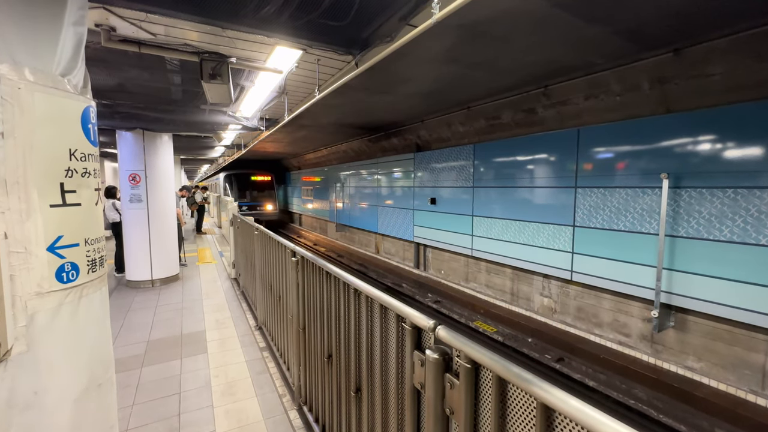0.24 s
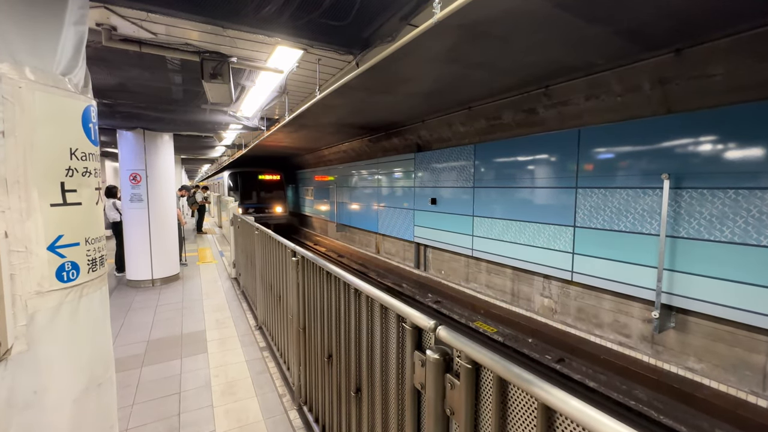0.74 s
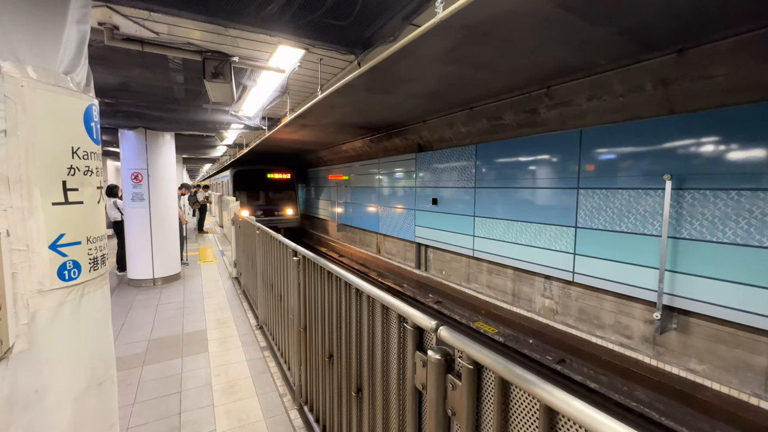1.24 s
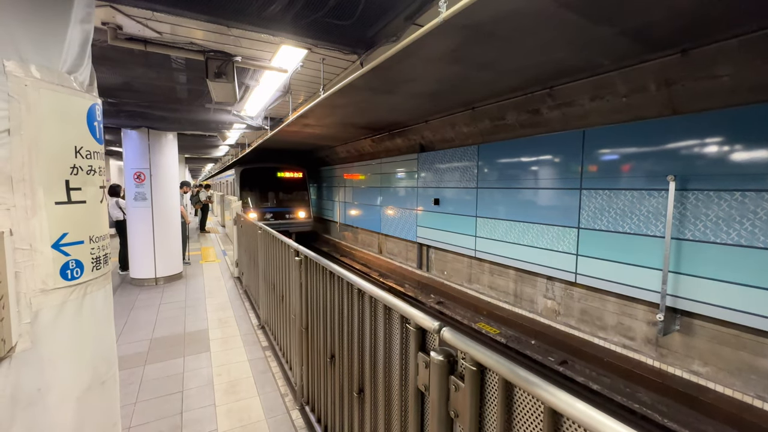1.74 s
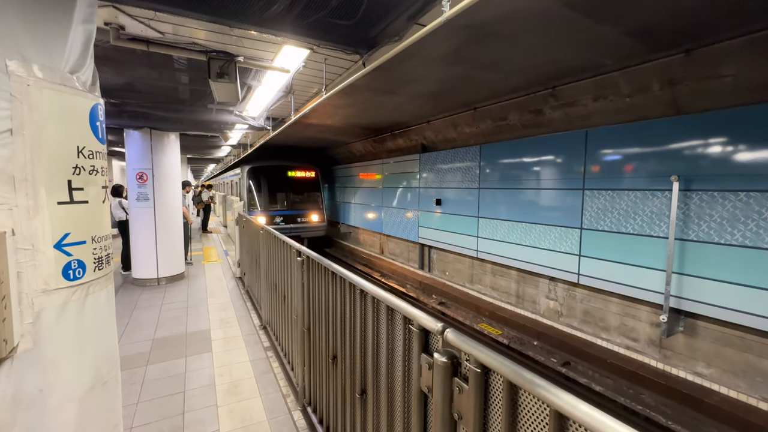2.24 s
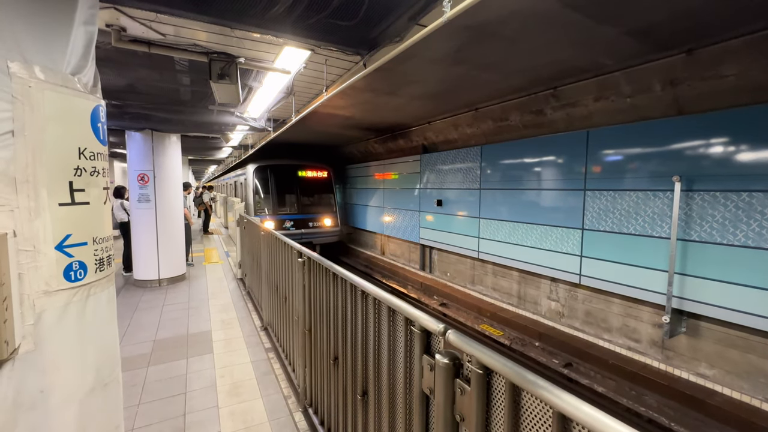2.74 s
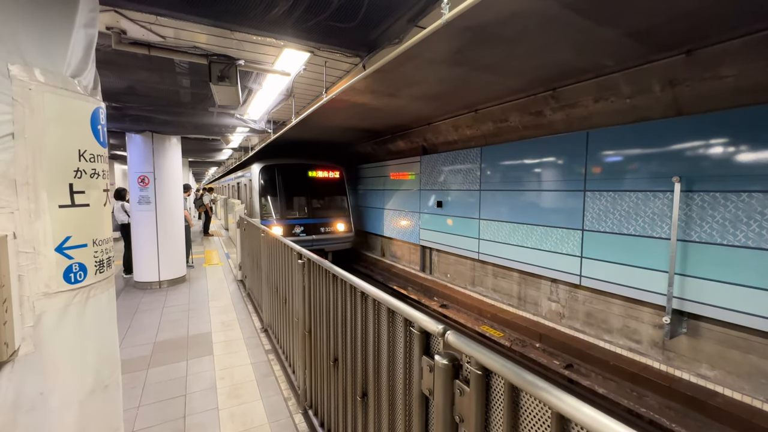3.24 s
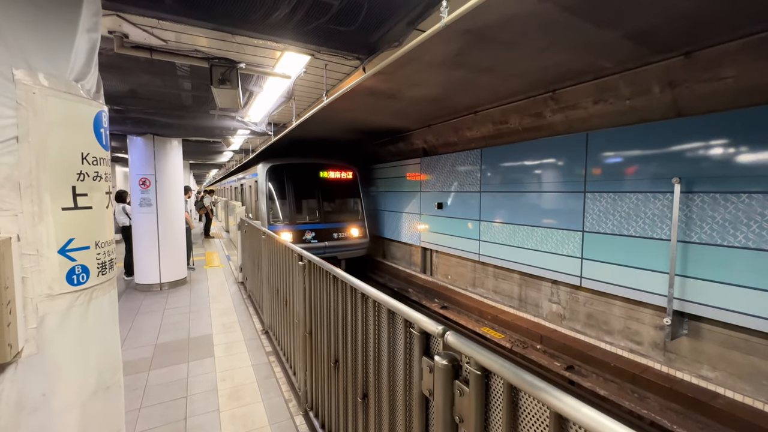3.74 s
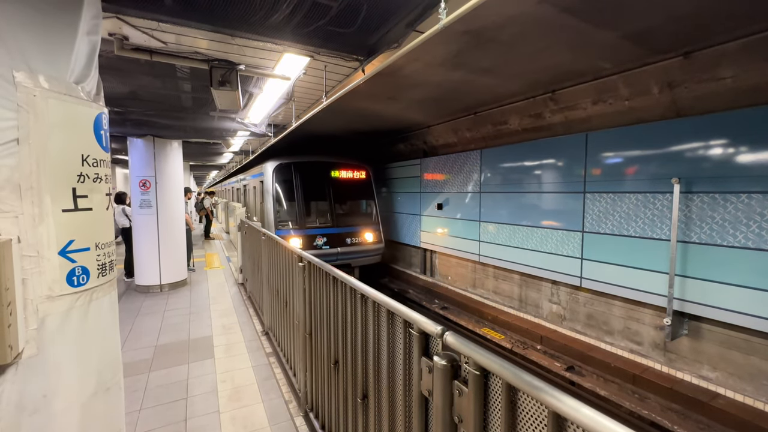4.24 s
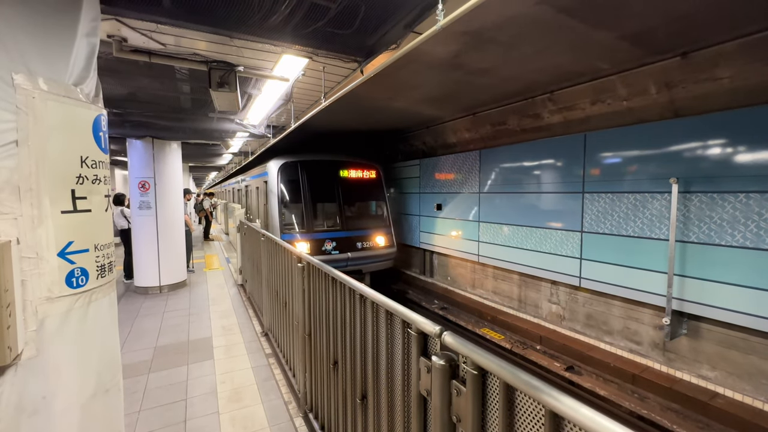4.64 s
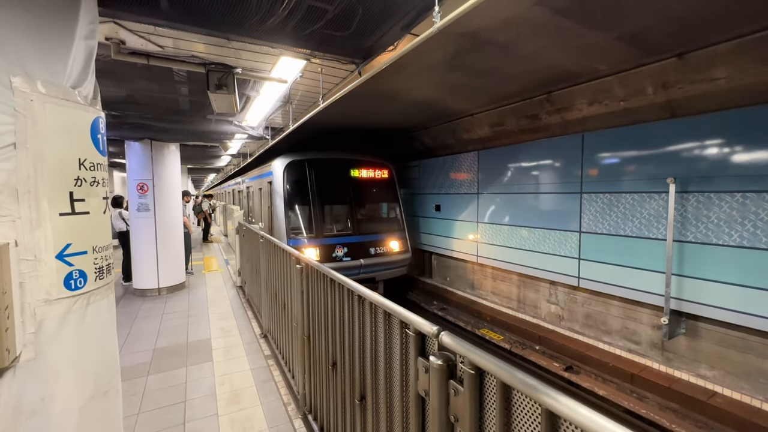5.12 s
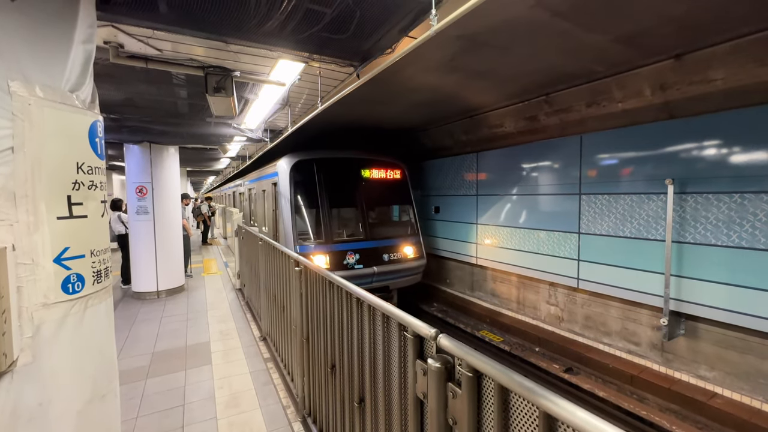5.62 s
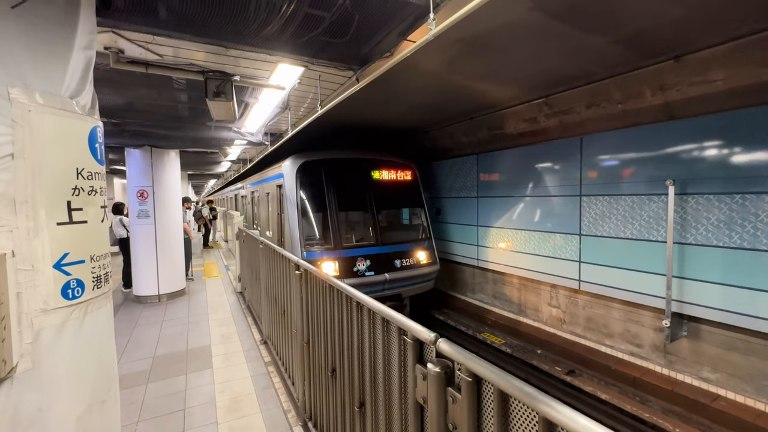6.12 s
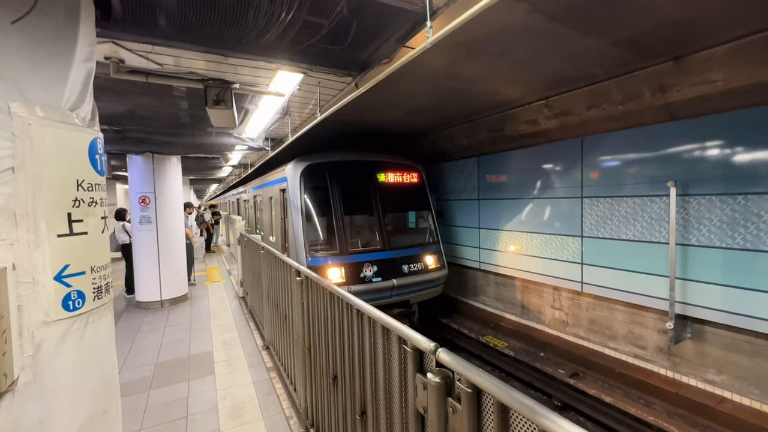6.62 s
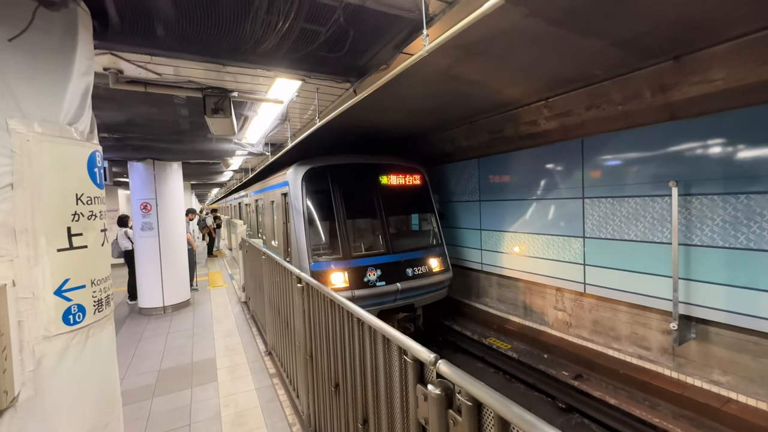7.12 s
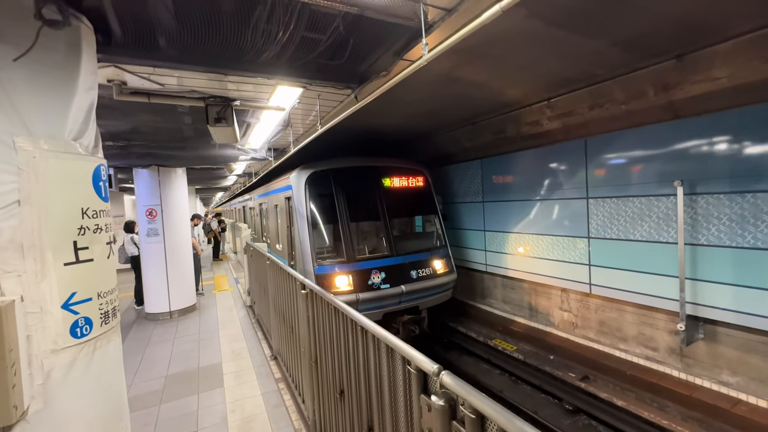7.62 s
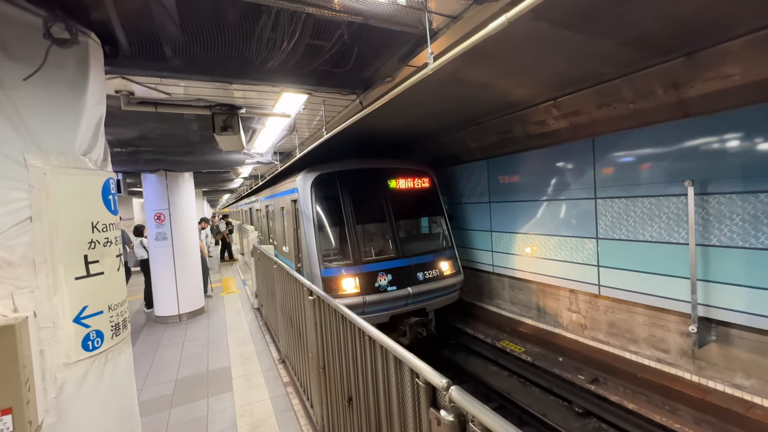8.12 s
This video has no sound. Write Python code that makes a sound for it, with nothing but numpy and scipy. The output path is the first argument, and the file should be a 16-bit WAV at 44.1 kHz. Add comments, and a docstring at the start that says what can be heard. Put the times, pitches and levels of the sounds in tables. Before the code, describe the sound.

A metro train brakes into a tiled underground station, high wavering wheel squeals over a low rumble and roar, squealing fading out near the end.

```python
"""Metro train braking into a station

A train brakes into a tiled underground station, heard by a phone on the platform.
Wheels and brakes squeal: near sines slide along pitch curves, and a diffuse hall tail smears them.
Bands of shaped noise make the tunnel rumble, the car body drone, the rail roar and the wheel hiss.
The phone's wind filter thins the rumble for a while. A wavering sine is the transformer hum;
blurred noise bursts are rail joints knocking down the track."""
import sys
import numpy as np
from scipy import signal
from scipy.fft import rfft, irfft, next_fast_len
from scipy.io import wavfile
from scipy.ndimage import uniform_filter1d

SR = 44100
rng = np.random.default_rng(int(sys.argv[2]) if len(sys.argv) > 2 else 0)


def wrap_up_sound(samples):
    """Save the sound to the file named by the first command line argument, as 16-bit audio."""
    columns = np.atleast_2d(samples).T
    # keep every value between -1 and 1, then stretch to whole-number steps
    tamed = np.clip(columns, -1, 1)
    steps = np.round(tamed * 32767).astype(np.int16)
    wavfile.write(sys.argv[1], SR, steps)


N = 369116
SIZE = next_fast_len(N + SR)  # transform length, with room for a 1 s tail
FREQ = np.arange(SIZE // 2 + 1) * SR / SIZE
LEFT_LAG, REAR_LAG = 14, 17  # samples by which the left port hears the front and rear wheels late


def undb(db):
    """Decibels to amplitude."""
    return 10 ** (np.asarray(db) / 20)


def over_time(table):
    """Columns of a curve at every sample."""
    s, *columns = np.transpose(table)
    return [np.interp(np.arange(N) / SR, s, column) for column in columns]


def over_freq(points):
    """A (Hz, value) table at every transform bin, straight over log frequency."""
    hz, value = np.transpose(points)
    return np.interp(np.log(FREQ + 1), np.log(hz), value)


def walk(rate, size=N):
    """Random levels held 1 / rate s and smoothed twice into slow drift; spread near 1."""
    hold = int(SR / rate)
    steps = np.repeat(rng.standard_normal(size // hold + 1), hold)
    return 1.333 * uniform_filter1d(uniform_filter1d(steps, hold), hold)[:size]


def add(track, start, sound):
    """Mix a sound in at a time in s."""
    i = max(int(start * SR), 0)
    track[..., i:i + sound.shape[-1]] += sound[..., :N - i]


# Likeness of the noise at the two ports. Each row: frequency in Hz, shared part of the power 0-1.
PORT_LIKENESS = [(30, 1), (130, 0.6), (300, 0.44), (700, 0.18), (1500, 0.11), (3000, 0.043), (9000, 0.16)]


def noise(colour):
    """Stereo noise of rms 1; the shared part comes from the right and reaches the left port late."""
    shared, left, right = rfft(rng.standard_normal((3, SIZE)))
    alike = np.clip(over_freq(PORT_LIKENESS), 0, 1)
    late = np.exp(-2j * np.pi * FREQ * LEFT_LAG / SR)
    common = np.sqrt(alike) * np.array([shared * late, shared])
    separate = np.sqrt(1 - alike) * np.array([left, right])
    inside = (FREQ > colour[0][0]) & (FREQ < colour[-1][0])
    out = irfft((common + separate) * undb(over_freq(colour)) * inside, SIZE)[:, :N]
    return out / np.sqrt(np.mean(out ** 2))


# Bass levels at the phone. Each row: time in seconds, deep throb in dB, rumble in dB.
BASS_LEVELS = [(0, -44, -22), (.4, -42, -22.5), (1.1, -42, -28), (1.5, -37, -26), (1.62, -53, -35.5),
               (2.4, -54, -31.5), (2.9, -49, -29), (3.3, -41, -30.5), (4.1, -43, -31.5), (4.9, -63, -34),
               (5.05, -35, -26.5), (5.9, -43, -26), (6.35, -32, -25), (6.9, -31.5, -22.5), (7.1, -33, -24),
               (7.35, -31, -20), (7.9, -25, -21), (8.37, -33, -22)]
# Noise colours. Each row: frequency in Hz, relative density in dB per Hz.
THROB_COLOUR = [(15, -30), (28, -13), (45, 0), (60, -3), (90, -30)]
RUMBLE_COLOUR = [(30, -44), (60, 2), (74, -1.5), (85, 2.5), (100, -4), (118, -2), (180, -17.5)]


def bass():
    """Deep throb and rumble, thinned from about 1.6 to 5 s while the phone's wind filter cuts the bass."""
    throb_db, rumble_db = over_time(BASS_LEVELS)
    throb = noise(THROB_COLOUR) * undb(throb_db)
    return throb + noise(RUMBLE_COLOUR) * undb(rumble_db + 0.18 * walk(5.5))


# Rolling levels. Each row: time in seconds, car body drone in dB, rail roar in dB, wheel hiss in dB.
ROLLING_LEVELS = [(0, -24, -22, -29), (.42, -29, -27.5, -34.5), (.77, -25, -25.5, -31.5),
                  (1.19, -29, -28.5, -36), (1.49, -26.5, -24, -34), (1.65, -36.5, -29, -32),
                  (2.26, -33, -28, -30.5), (2.4, -31.5, -24.5, -30.5), (2.6, -32, -23.5, -29),
                  (2.75, -25.5, -19, -28), (3.2, -29.5, -21, -29), (3.64, -22, -18.5, -29),
                  (3.95, -28, -19.5, -27.5), (4.3, -32, -19.5, -29), (4.5, -27.5, -22.5, -31),
                  (4.89, -28.5, -24, -33.5), (4.99, -23.5, -21.5, -28.5), (5.1, -25.5, -20.5, -30),
                  (5.5, -24.5, -23.5, -30.5), (5.97, -29.5, -24, -32), (6.07, -28.5, -23, -30),
                  (6.22, -26, -24.5, -31.5), (6.6, -25.5, -23, -28.5), (7.15, -27, -22, -30),
                  (7.4, -27.5, -21.5, -29), (7.6, -30, -22, -29.5), (8.0, -26.5, -21, -26.5),
                  (8.37, -28, -23, -29.5)]
# Noise colours. Each row: frequency in Hz, relative density in dB per Hz.
DRONE_COLOUR = [(80, -16), (135, 2.5), (200, 0.5), (280, -2), (400, -37)]
ROAR_COLOUR = [(200, -15.5), (300, -2.5), (350, -0.5), (392, 2.5), (455, -2.5), (482, -0.5), (500, -4),
               (600, -5.5), (700, -4), (760, -3.5), (830, -6), (1100, -9), (2000, -55)]
HISS_COLOUR = [(600, -3), (1300, 0.5), (2200, -5.5), (4000, -14.5), (7000, -24), (10200, -31), (10600, -60),
               (12300, -60), (13200, -28), (16000, -43)]


def rolling():
    """Wheels on rails as three noise bands, each with its own slight level flicker."""
    drone_db, roar_db, hiss_db = over_time(ROLLING_LEVELS)
    drone = noise(DRONE_COLOUR) * undb(drone_db + 0.63 * walk(14))
    roar = noise(ROAR_COLOUR) * undb(roar_db + 0.86 * walk(14))
    hiss = noise(HISS_COLOUR) * undb(hiss_db + 0.98 * walk(20))
    return drone + roar + hiss


# Transformer hum. Each row: time in seconds, level in dB before a slight flicker.
HUM_LEVELS = [(0, -36), (1.0, -34), (1.3, -57), (3.6, -59), (3.8, -31), (4.6, -34), (5.2, -24.5),
              (5.4, -43), (5.7, -27), (6.2, -26), (6.4, -36), (8.37, -35)]
HUM_HZ = 117  # centre of a slight drift


def hum():
    """A transformer hums on one line, slightly unsteady in pitch and level."""
    phase = 2 * np.pi * np.cumsum(HUM_HZ + .6 * walk(3)) / SR
    return np.sin(phase) * undb(over_time(HUM_LEVELS)[0] + 1.5 * walk(8))


# Rail joints far down the track. Each row: start in seconds, level in dB.
KNOCK_HITS = [(2.31, -34), (3.29, -25.5), (3.81, -27.5), (5.02, -43), (6.281, -26.5)]
# Knock colour. Each row: frequency in Hz, relative density in dB per Hz.
KNOCK_COLOUR = [(500, -30), (1400, -6), (1580, 12), (1750, 2), (2000, 5), (2500, -6), (2900, 2), (3200, -8),
                (4500, -9), (14000, -51)]


def knocks(rise_s=0.019, t60_s=0.79):
    """Blows that arrive blurred by the tunnel: noise with a quick rise and a tail."""
    t = np.arange(SR) / SR
    shape = np.clip(t / rise_s, 0, 1) * np.exp(-np.log(1000) * t / t60_s)
    swell = np.zeros(N)
    for start, db in KNOCK_HITS:
        add(swell, start, shape * undb(db))
    return swell * noise(KNOCK_COLOUR)


# Squealing further back, shared by scrape and chorus. Each row: time in seconds, level in dB before trims.
CHORUS_LEVELS = [(0, -35), (.93, -38), (1.3, -36.5), (2.52, -36), (2.7, -44.5), (3.28, -45), (3.5, -36),
                 (4.34, -36.5), (4.61, -42), (5.2, -31.5), (5.5, -44), (5.74, -34.5), (6.22, -35),
                 (6.64, -42), (6.78, -80), (7.0, -57), (7.3, -52), (7.45, -66), (8.37, -75)]
CHORUS_TRIM_DB, SCRAPE_TRIM_DB = -11, -3.5
# Brake scrape colour. Each row: frequency in Hz, relative density in dB per Hz.
SCRAPE_COLOUR = [(3000, -41), (4500, -2), (6500, 6.5), (7500, -5), (9000, 15.5), (10300, -30), (11200, -55),
                 (16000, -37)]


def scrape():
    """Brake pads grind as flickering noise that swells with the chorus of squeals."""
    flicker_db = 2.5 * walk(10)
    return noise(SCRAPE_COLOUR) * undb(over_time(CHORUS_LEVELS)[0] + SCRAPE_TRIM_DB + flicker_db)


# Squeals clean up as the train slows. Each row: squeal start in seconds, unsteadiness (a factor on
# waver, hops and slips), rasp depth 0-1.
SQUEAL_ROUGHNESS = [(0, 1, 0.32), (4.1, 0.86, 0.16), (5.14, 0.97, 0.2), (5.36, 0.3, 0.14),
                    (6.3, 0.32, 0.32), (6.6, 0.18, 0.26)]


def squeals(curves, waver_percent=0.92, flutter_db=3.0, octave_db=-10, octave_top_db=-21,
            hop_share=0.0082, slip_db=-9, rise_s=0.0039, fall_s=0.025):
    """Stick-slip on a wheel mode: a near sine that wavers, hops, slips and rasps under a saturating octave."""
    out = np.zeros(N)
    waver, flutter, rasp = [walk(rate, size=2 * N) for rate in (220, 50, 400)]
    hop = np.tanh(3 * walk(35, size=2 * N))  # mostly flips between two close pitches
    slip = np.clip(2 * walk(70, size=2 * N) - 1, 0, 1)  # 1 where grip is lost
    when, unsteadiness, rasp_depth = np.transpose(SQUEAL_ROUGHNESS)
    for curve, place in zip(curves, rng.random(len(curves))):
        s, pitch, db = np.transpose(curve)
        t = np.arange(int(max(s[-1] - s[0], .01) * SR)) / SR
        # each squeal reads its own random stretch of the drifts
        own = slice(int(place * N), int(place * N) + len(t))
        unsteady = np.interp(s[0], when, unsteadiness)
        depth = np.interp(s[0], when, rasp_depth)

        hz = np.interp(t + s[0], s, pitch)
        hz = hz * (1 + waver_percent / 100 * unsteady * waver[own])
        hz = hz * (1 + hop_share * unsteady * hop[own])
        phase = 2 * np.pi * np.cumsum(hz) / SR

        level_db = np.interp(t + s[0], s, db) + flutter_db * flutter[own]
        level_db = level_db + slip_db * unsteady * slip[own]
        swell = np.clip(np.minimum(t / rise_s, (t[-1] - t) / fall_s), 0, 1)
        swell = swell * undb(level_db) * (1 + depth * rasp[own])

        # the octave levels off on loud squeals; high squeals have none
        octave_swell = undb(octave_db + octave_top_db) * np.tanh(swell / undb(octave_top_db))
        octave = octave_swell * np.sin(2 * phase) * (pitch[0] < SR / 5)
        add(out, s[0], swell * np.sin(phase) + octave)
    return out


SLIDE_SPAN_HZ = 306  # full spread of the chance slides early on


def short(rows):
    """Brief squeals slide straight by a chance amount, mostly down, less once the train is slow."""
    slowing = np.interp(np.transpose(rows)[0], [5.2, 6.4], [1, .35])
    slides = SLIDE_SPAN_HZ * (rng.random(len(rows)) - .62) * slowing
    curves = []
    for (start, length, hz, db), slide in zip(rows, slides):
        curves.append([(start, hz - slide / 2, db), (start + length, hz + slide / 2, db)])
    return squeals(curves)


def chorus(count=700):
    """Fainter wheels further back: short squeals scattered over time and high modes, following a level curve."""
    when, pitch, length, loud = rng.random((count, 4)).T
    start = when * N / SR
    hz = 5500 + 5000 * pitch ** .55
    db = np.interp(start, *np.transpose(CHORUS_LEVELS)) + CHORUS_TRIM_DB + 5 * (loud - .5)
    return short(np.transpose([start, 0.038 + 0.121 * length, hz, db]))


# Short squeals. Each row: start in seconds, length in seconds, mid pitch in Hz, level in dB before flutter.
SHORT_SQUEALS = [(.075, 0.086, 8580, -36), (.11, 0.067, 5800, -34), (.125, 0.16, 8710, -32),
                 (.224, 0.035, 9200, -21), (.36, 0.11, 4930, -38), (.5, 0.145, 4940, -38),
                 (.14, .1, 8950, -29.5), (.3, .13, 8840, -46), (.55, 0.137, 8900, -36),
                 (.69, 0.081, 7960, -29), (.95, 0.071, 8440, -46), (.37, 0.113, 5930, -38),
                 (.96, 0.166, 4780, -36), (.635, .04, 6120, -36), (.439, 0.093, 9230, -27),
                 (.459, 0.17, 8500, -35), (.53, 0.12, 8130, -33), (.4, 0.11, 6900, -28),
                 (.683, 0.1, 7120, -28), (.763, 0.13, 9360, -25), (.763, 0.17, 8360, -35),
                 (1.098, 0.062, 9300, -29), (1.207, 0.11, 4810, -32.5), (1.25, 0.12, 8470, -35),
                 (1.352, 0.1, 9570, -33), (.79, 0.15, 5430, -38.5), (1.402, 0.074, 9270, -38),
                 (1.417, 0.07, 8900, -19), (1.591, 0.103, 8660, -33.5), (1.726, 0.14, 9700, -28.5),
                 (1.776, 0.094, 4900, -32), (1.82, 0.11, 5530, -38), (1.821, 0.088, 8700, -32),
                 (1.906, 0.14, 9160, -28), (2.02, 0.162, 4520, -40), (2.38, 0.052, 6000, -50),
                 (2.48, 0.1, 6250, -46), (2.85, 0.036, 4180, -43), (2.95, 0.043, 4070, -41),
                 (4.42, 0.073, 6300, -44), (4.47, 0.087, 6950, -32), (4.87, .06, 7300, -39),
                 (5.3, 0.059, 5150, -37), (5.38, 0.094, 8800, -34), (5.77, .08, 5400, -38.5),
                 (5.7, .1, 7800, -34), (5.5, 0.17, 8070, -42), (3.3, .04, 4000, -43),
                 (4.6, 0.087, 6300, -38), (4.67, 0.099, 5280, -44), (5.32, 0.12, 5300, -36),
                 (6.605, 0.075, 6160, -32.5), (6.7, .06, 6160, -39), (6.57, 0.073, 5720, -39),
                 (6.48, .08, 5630, -49), (1.99, 0.089, 7460, -32), (2.06, 0.048, 7200, -34),
                 (2.18, 0.079, 7840, -32), (2.305, 0.056, 8480, -34), (2.365, 0.15, 7760, -35),
                 (2.579, 0.063, 9350, -27), (2.799, 0.13, 6650, -42), (2.873, 0.073, 9320, -37),
                 (2.948, 0.061, 6170, -36), (3.4, 0.066, 7140, -36), (3.417, 0.22, 9600, -35),
                 (3.507, 0.08, 8200, -36), (3.642, 0.186, 9300, -31), (3.642, 0.256, 10050, -37.5),
                 (3.781, 0.158, 8780, -26.5), (3.881, 0.084, 9200, -33), (3.89, 0.06, 6880, -35),
                 (3.94, 0.122, 7080, -40), (3.921, 0.061, 9700, -24.5), (4.03, 0.071, 5910, -31),
                 (3.95, 0.058, 6050, -40), (4.1, .12, 5840, -43), (4.061, 0.095, 7580, -30.5),
                 (4.116, 0.19, 9370, -32), (4.205, 0.05, 4160, -33.5), (4.215, 0.15, 8200, -29.5),
                 (4.23, 0.12, 7680, -36), (4.255, 0.045, 5770, -22.5), (4.31, .07, 6000, -36),
                 (4.31, 0.045, 6740, -14.5), (4.36, 0.031, 6740, -19), (4.39, 0.042, 6760, -28),
                 (4.375, 0.164, 7360, -33), (4.4, 0.14, 7860, -25.5), (4.5, 0.13, 7740, -27.5),
                 (4.66, .16, 7860, -36), (4.33, .12, 8750, -37), (4.45, .15, 9000, -45),
                 (4.42, .12, 9700, -48), (5.17, .1, 8400, -38), (4.555, 0.099, 9900, -31),
                 (4.585, 0.089, 6850, -28), (4.59, 0.066, 9700, -27), (4.62, 0.087, 8920, -23),
                 (4.654, 0.051, 8530, -22), (4.669, 0.164, 8660, -34), (4.719, 0.077, 9950, -26),
                 (4.794, 0.047, 9060, -26), (4.82, 0.077, 5440, -37), (4.869, 0.064, 8870, -23),
                 (4.924, 0.056, 7140, -28), (4.969, 0.082, 10050, -28.5), (5.004, 0.16, 10500, -34),
                 (5.063, 0.064, 9370, -25), (5.088, 0.046, 9660, -26), (5.198, .07, 8750, -35),
                 (5.222, 0.045, 5450, -31), (5.64, 0.081, 5020, -38), (5.27, 0.062, 5160, -38),
                 (5.74, 0.11, 5430, -43), (5.348, 0.11, 8380, -30), (5.612, 0.36, 10600, -47),
                 (5.667, 0.072, 8200, -28), (5.677, 0.089, 9420, -26), (5.867, 0.21, 9200, -33),
                 (5.996, 0.069, 9620, -31), (6.026, 0.16, 8800, -31), (6.046, 0.24, 7850, -35.5),
                 (6.141, 0.076, 9400, -23), (6.196, 0.14, 8640, -46), (6.261, 0.23, 9000, -37),
                 (6.575, 0.11, 9590, -34), (6.775, 0.085, 10460, -39), (6.9, 0.3, 9060, -44),
                 (6.95, 0.26, 8850, -48.5), (7.05, 0.33, 8450, -52), (6.7, .2, 9900, -52),
                 (6.7, 0.12, 10900, -48), (6.88, 0.091, 10800, -43), (7.129, 0.16, 8650, -53),
                 (7.204, 0.12, 10100, -45)]


def short_squeals():
    """Rear wheels catch a mode for a moment and break off."""
    return short(SHORT_SQUEALS)


# Swoops, one curve each. Each row: time in seconds, pitch in Hz, level in dB before flutter.
SWOOPS = [
    [(.243, 5270, -33), (.29, 5020, -23), (.32, 4770, -23), (.34, 4590, -20), (.36, 4470, -29),
     (.39, 4450, -47), (.52, 4420, -25)],
    [(.889, 5010, -30), (.93, 4920, -22), (.955, 4600, -30), (1.0, 4580, -25), (1.09, 4500, -41),
     (1.105, 4350, -22.5), (1.27, 4410, -49)],
    [(1.59, 5220, -31), (1.615, 4990, -18), (1.63, 4710, -19), (1.68, 4760, -20), (1.7, 4600, -18.5),
     (1.8, 4400, -27), (1.85, 4780, -27), (1.862, 4420, -11.5), (1.92, 4350, -31.5), (2.03, 4350, -35)],
]


def swoops():
    """One wheel squeals once a turn, swooping down through its modes, for three turns."""
    return squeals(SWOOPS, waver_percent=1.5)


# Held squeals, one curve each. Each row: time in seconds, pitch in Hz, level in dB before flutter.
HELD_SQUEALS = [
    [(0.09, 6800, -25), (0.112, 6650, -20.5), (0.192, 6910, -43), (0.274, 6500, -19), (.34, 6750, -25.5),
     (.45, 6430, -26.5), (.575, 6790, -20.5), (.64, 6570, -31), (0.734, 6650, -28), (0.744, 6800, -40),
     (0.844, 6920, -27.5), (1.02, 6470, -26), (1.13, 6550, -33.5), (1.354, 6560, -32), (1.432, 6800, -31),
     (1.492, 6701, -46), (1.5, 6906, -48)],
    [(1.725, 6430, -31), (1.79, 6380, -21), (1.9, 6390, -36), (2.05, 6470, -45), (2.36, 6480, -43)],
    [(.55, 5930, -51), (.75, 6090, -37), (.98, 6440, -34)],
    [(1.38, 5700, -44), (1.46, 5530, -37), (1.55, 4920, -31)],
    [(2.02, 3680, -44), (2.14, 3700, -44), (2.24, 3720, -49)],
    [(2.47, 3790, -46), (2.55, 3870, -39), (2.7, 3800, -45), (2.82, 3900, -57)],
    [(4.43, 3720, -49), (4.5, 3720, -43), (4.58, 3790, -47), (4.68, 3770, -40.5), (4.76, 3810, -51)],
    [(3.05, 3750, -48), (3.09, 3750, -43), (3.2, 3730, -45), (3.33, 3740, -43)],
    [(3.14, 6360, -62), (3.158, 6450, -40), (3.316, 6320, -32.5), (3.52, 6820, -44)],
    [(3.48, 7430, -61), (3.504, 7450, -26.5), (3.814, 7450, -33), (3.86, 7360, -49)],
    [(3.74, 3940, -44), (3.86, 3950, -41), (3.99, 3930, -52)],
    [(4.7, 6050, -33), (4.8, 5770, -38), (4.95, 5770, -31), (5.05, 5930, -42)],
    [(5.06, 6260, -29), (5.1, 6190, -31), (5.125, 5920, -31), (5.135, 6000, -20), (5.15, 6070, -39),
     (5.28, 6150, -37)],
    [(4.73, 7100, -24), (4.802, 6660, -20.5), (4.838, 6830, -23.5), (5.086, 6870, -53), (5.108, 7000, -26),
     (5.2, 6880, -35)],
    [(5.255, 4944, -25), (5.4, 4950, -26.5), (5.55, 4927, -30.5), (5.65, 4840, -32.5), (5.8, 4860, -35),
     (5.9, 4840, -57)],
    [(5.28, 6870, -26), (5.454, 6733, -27.5), (5.6, 6643, -24), (5.87, 7160, -30), (5.948, 7260, -37),
     (6.012, 7130, -27), (6.12, 7256, -50)],
    [(5.3, 5660, -51), (5.31, 5560, -39), (5.43, 5580, -38), (5.47, 5660, -31), (5.6, 5740, -28),
     (5.7, 5710, -36), (5.75, 5560, -54)],
    [(5.72, 6060, -36.5), (6.13, 6260, -29), (6.144, 6360, -15.5), (6.23, 6320, -38), (6.33, 6380, -32),
     (6.385, 6320, -37), (6.4, 6270, -51)],
    [(5.72, 8530, -34), (5.76, 7620, -26.5), (6.02, 8230, -25), (6.146, 8070, -43), (6.248, 8500, -19),
     (6.29, 8000, -46), (6.338, 8150, -31), (6.48, 8440, -40)],
    [(6.31, 6100, -36), (6.4, 6070, -42), (6.43, 5900, -48)],
    [(6.385, 5700, -37), (6.435, 5670, -43), (6.46, 5530, -39), (6.55, 5470, -40), (6.64, 5520, -43)],
    [(6.52, 6700, -43), (6.6, 6520, -44), (6.64, 6540, -32), (6.74, 6480, -38), (6.98, 6530, -58)],
    [(6.0, 12600, -53), (6.15, 12800, -49), (6.4, 12500, -45), (6.54, 12350, -39), (6.8, 12450, -54),
     (7.04, 12800, -61), (7.1, 12700, -50), (7.35, 12500, -58)],
    [(6.705, 6330, -36), (6.83, 6330, -26.5), (6.865, 6380, -49), (6.9, 6290, -29), (6.96, 6370, -34),
     (6.99, 6370, -25), (7.03, 6340, -48), (7.29, 6310, -49)],
    [(7.0, 7400, -46), (7.04, 7300, -41), (7.1, 7270, -51), (7.22, 7070, -51), (7.3, 7100, -54)],
    [(6.645, 8420, -34), (6.85, 8500, -43), (7.05, 8770, -55), (7.2, 8480, -47), (7.38, 8100, -53)],
]


def held_squeals():
    """Wheels stay locked on a mode and glide in pitch while the level rises and falls."""
    return squeals(HELD_SQUEALS, waver_percent=0.854)


HALL_T60_S, HALL_DB = 0.57, -0.8  # decay time, tail energy against the direct sound


def hall(x, lag):
    """Tiled walls: direct sound, late by lag samples at the left, plus a separate diffuse tail per port."""
    t = np.arange(SR) / SR
    decay = np.exp(-np.log(1000) * t / HALL_T60_S) * np.clip(t / 0.0023, 0, 1)
    response = rng.standard_normal((2, SR)) * decay
    response *= undb(HALL_DB) / np.sqrt(np.sum(response ** 2, axis=1, keepdims=True))
    response[0, lag] += 1
    response[1, 0] += 1
    return irfft(rfft(response, SIZE) * rfft(x, SIZE), SIZE)[:, :N]


def scene():
    """Squeals through the hall over the rolling noise; the rear wheels sound from another angle."""
    background = bass() + rolling() + hum() + knocks() + scrape()
    rear = chorus() + short_squeals()
    front = swoops() + held_squeals()
    return background + hall(rear, REAR_LAG) + hall(front, LEFT_LAG)


# The phone's two ports. Each row: frequency in Hz, left minus right in dB.
PORT_BALANCE = [(60, 1), (380, -.5), (1300, 2.5), (3500, 2.6), (6500, 9), (7800, 0.1), (9300, -6),
                (12000, 0.7)]
TOP_HZ = 15450  # edge of the steep treble cut


def record(dry):
    """The phone's body colours each port oppositely; the top is cut."""
    half = undb(over_freq(PORT_BALANCE) / 2)
    ports = irfft(rfft(dry, SIZE) * np.array([half, 1 / half]), SIZE)[:, :N]
    return signal.sosfilt(signal.ellip(10, .2, 70, TOP_HZ, fs=SR, output="sos"), ports)


dry = scene()
out = record(dry)
wrap_up_sound(out)
```